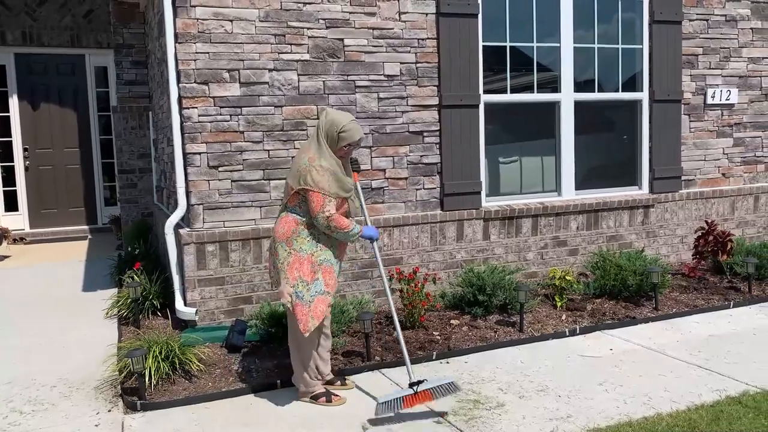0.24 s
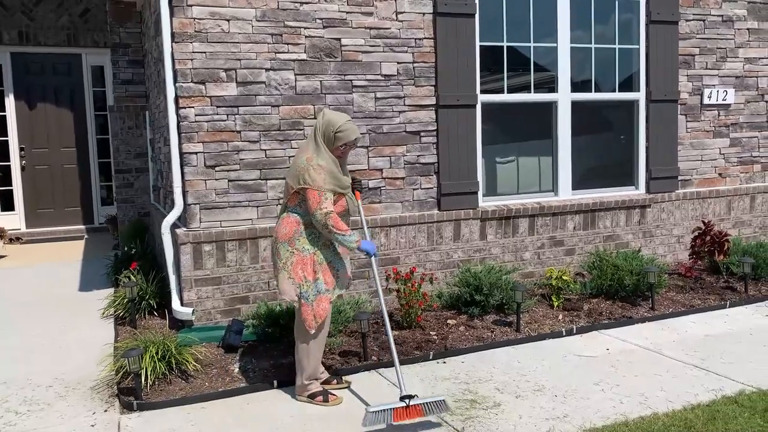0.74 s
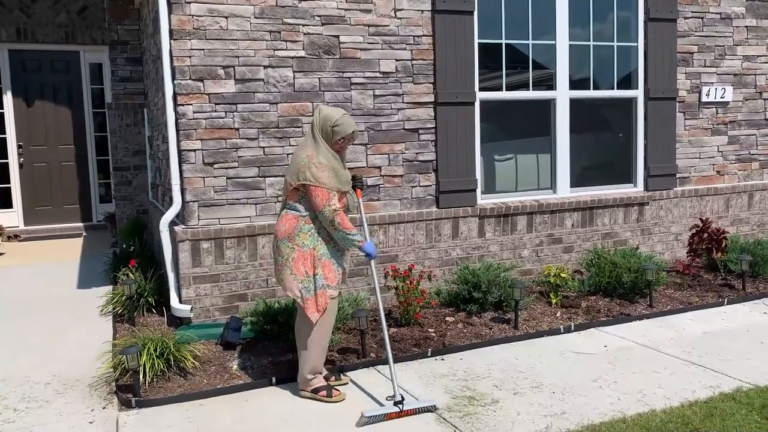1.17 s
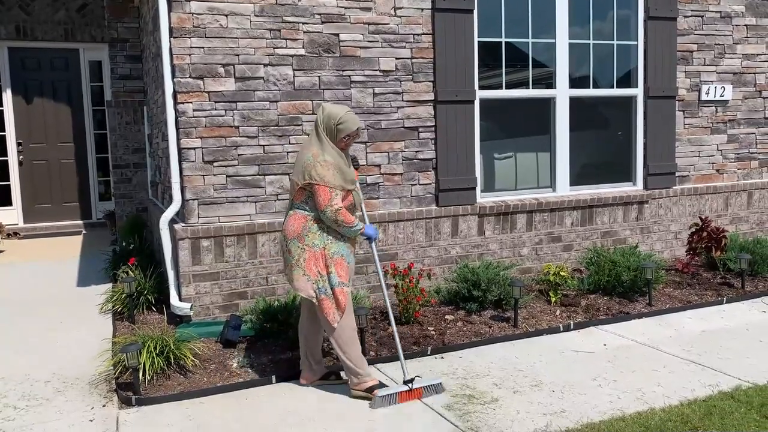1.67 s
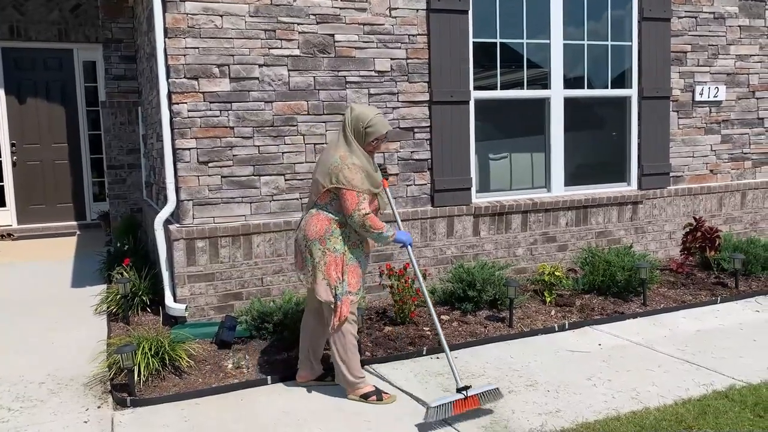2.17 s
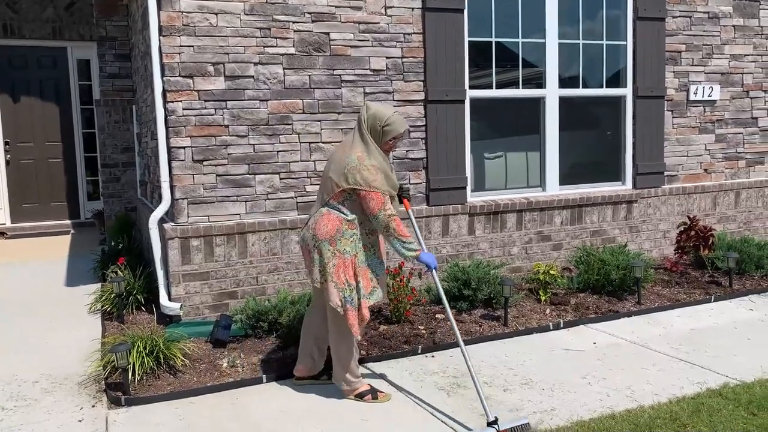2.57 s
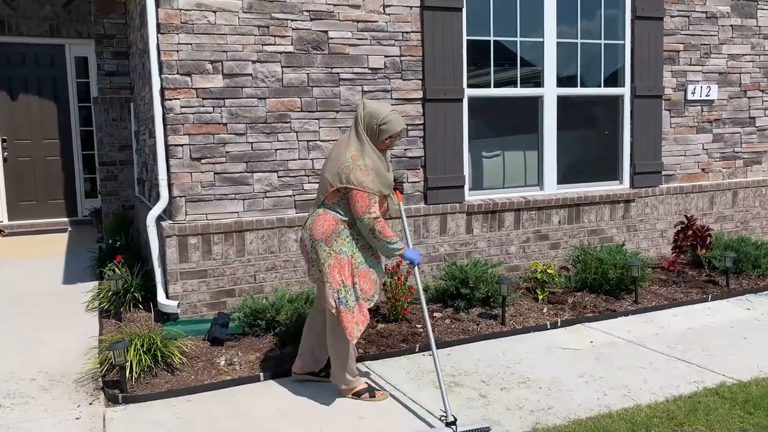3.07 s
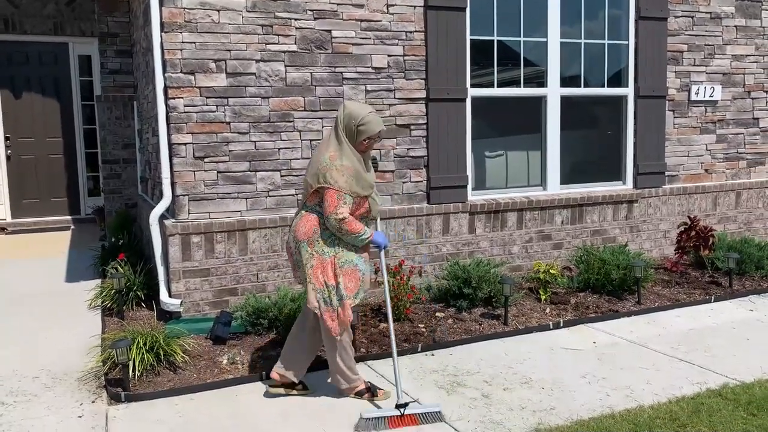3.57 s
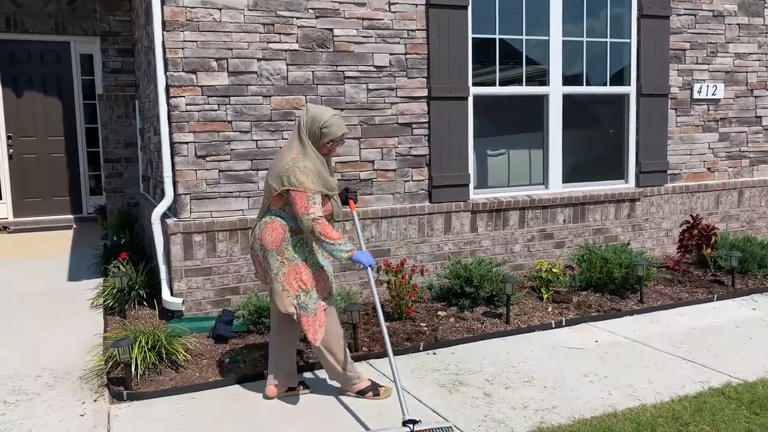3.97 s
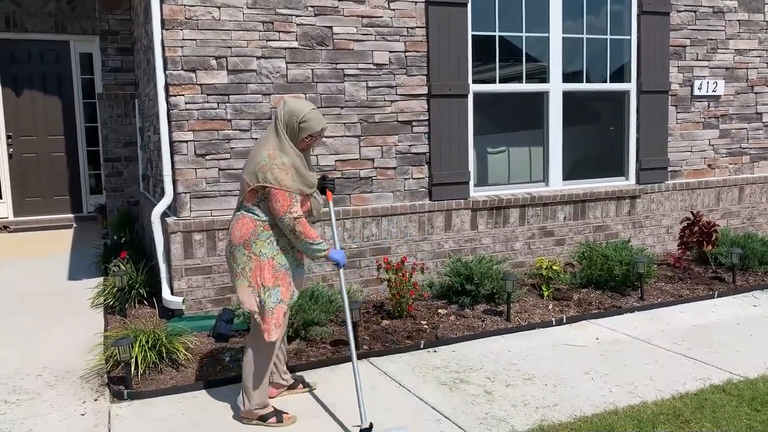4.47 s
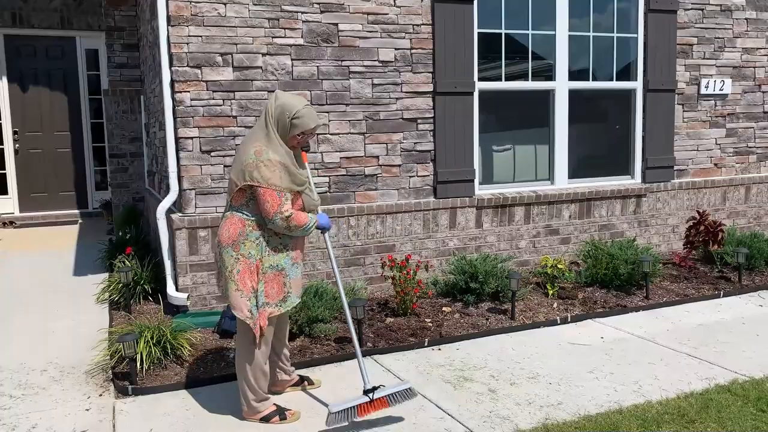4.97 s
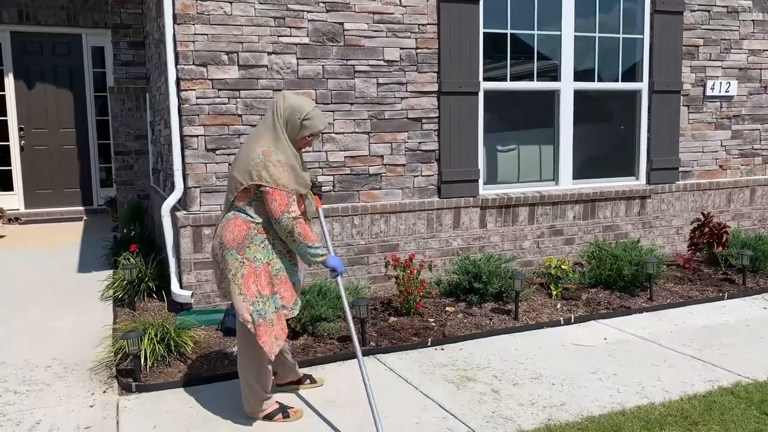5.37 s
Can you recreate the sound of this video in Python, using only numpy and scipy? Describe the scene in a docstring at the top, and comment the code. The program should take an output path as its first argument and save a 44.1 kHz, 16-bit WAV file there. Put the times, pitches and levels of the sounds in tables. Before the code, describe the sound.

A stiff push broom sweeps grass cuttings along a concrete path outdoors. A stroke is already under way at the start, and more follow at about 0.4, 1.0, 1.6, 2.2, 2.9, 3.5, 4.2 and 5.1 seconds. Each of these begins with a brushy slap and a small knock of the hollow broom head, often with a quick bounce, then swells into a bright hiss and gritty scrape lasting roughly a third of a second. A thin rustle sometimes whispers between strokes, and the house wall adds a short, weak echo. Wind rumbles unevenly on the microphone, strongest from about 2.6 to 3.3 seconds, with a low thump near 3.2 seconds and smaller gusts until around 4.4. Underneath, throughout, are a faint neighbourhood murmur, the wavering hum of a distant air conditioner and a very faint, rapid, high ticking from the camera.

```python
"""Stiff bristles scratch over grit as a push broom sweeps grass cuttings along a concrete path.
The broom lands with a brushy slap and a knock of its hollow head, then hisses and scrapes as it is
pushed. The brick house behind it adds a short echo. Wind buffets the microphone now and then, over
a faint outdoor murmur, a far air conditioner's hum and the very faint, high ticking of a camera."""
import sys
import numpy as np
from scipy import signal
from scipy.fft import rfft, irfft, next_fast_len
from scipy.io import wavfile
from scipy.ndimage import uniform_filter1d

SR = 44100
rng = np.random.default_rng(int(sys.argv[2]) if len(sys.argv) > 2 else 0)


def log_audio(samples):
    """Write samples as a 16-bit WAV file to the path given in sys.argv[1]."""
    # one column per channel
    frames = np.atleast_2d(samples).T
    # limit to full scale, then quantise
    limited = np.clip(frames, -1, 1)
    pcm = np.round(limited * 32767).astype(np.int16)
    wavfile.write(sys.argv[1], SR, pcm)


N = 248283
TIME = np.arange(N) / SR
FFT_SIZE = next_fast_len(N + 8192)
FREQS = np.fft.rfftfreq(FFT_SIZE, 1 / SR)

# The pushes of the broom. Each row: start, time to top speed, speed-up time, slow-down time and time
# until the hand eases off, all in seconds; the drop on easing in dB; relative levels of hiss, scrape
# and spreading bristles in dB; treble tilt in dB per octave.
STROKES = [(0.0, 0.014, .136, 0.083, 0.11, 10, -33, -40, -57, 4),
           (0.407, 0.25, 0.3, 0.08, 0.26, 5, -36, -46.5, -63, 1),
           (0.987, 0.22, 0.18, 0.15, 0.36, 12, -33.5, -46, -58, 0),
           (1.629, 0.21, 0.17, 0.17, .305, 3, -34, -46.5, -61, -1),
           (2.216, 0.24, 0.18, 0.17, 0.324, 7.5, -34.8, -47, -51, -0.5),
           (2.914, .17, 0.19, .138, 0.17, 9.5, -36, -47, -49, 0),
           (3.505, 0.19, 0.16, 0.2, 0.25, 11.5, -34, -46.5, -46.5, 0.54),
           (4.176, 0.25, 0.17, 0.16, 0.31, 1.5, -32, -44.5, -46.5, 0.8),
           (5.053, .2, 0.16, 0.15, 0.45, 19, -33.5, -43.5, -55, 1)]


def pushes(swing_db=23, settle_s=0.044):
    """How strong hiss and scrape are: the bristles spread, the arm speeds up and slows, the hand eases."""
    hiss, scrape = np.zeros((2, N))
    for start, top, up, down, ease, ease_db, hiss_db, scrape_db, spread_db, _ in STROKES:
        age = np.maximum(TIME - start, 0)
        # the arm reaches speed early and runs out gradually
        slowness = np.where(age < top, np.abs((top - age) / up) ** 2.95, np.abs((age - top) / down) ** 1.82)
        eased = (1 + np.tanh((age - ease) / 0.013)) / 2
        effort = amp(-swing_db * np.minimum(slowness, 10) - ease_db * eased)
        spread = amp(spread_db) * np.exp(-age / settle_s)
        hiss += (TIME >= start) * (amp(hiss_db) * effort + spread)
        # the scrape follows the effort less steeply than the hiss
        scrape += (TIME >= start) * (amp(scrape_db) * effort ** 0.78 + amp(-8) * spread)
    return hiss, scrape


# The bright hiss of the bristle tips. Each row: frequency in Hz, relative level in dB.
HISS_COLOUR = [(2000, -54), (5000, -35.5), (6500, -12), (7800, -8.5), (8800, -2.5), (10300, 2), (12000, -1),
               (13700, -1), (15000, -6.5), (16000, -6)]
# The lower scrape over the grit. Each row: frequency in Hz, relative level in dB.
SCRAPE_COLOUR = [(200, -2), (500, -16.5), (750, -9.5), (1050, -3), (1350, -11.5), (1600, -6), (1950, -1.5),
                 (2450, -2), (2800, 2), (4000, 1), (5500, -1), (7300, 3.5), (9500, -12.5), (16000, -6)]


def bristles(hiss_db=2, scrape_db=3):
    """Thousands of bristle tips flick off uneven grit; whole tufts catch and let go together."""
    tufts = amp(1.2 * wander(19) + 0.5 * wander(350))  # slow bumps of grit, fast chatter
    hiss_gain, scrape_gain = pushes()
    hiss = stereo(clicks(per_s=26000, spread_db=1.5) * tufts * hiss_gain, colour(HISS_COLOUR))
    scrape = stereo(clicks(per_s=16000, spread_db=2.0) * tufts * scrape_gain, colour(SCRAPE_COLOUR))
    hiss = patchy_rasp(hiss, depth_db=2.36)
    scrape = patchy_rasp(scrape, depth_db=2.5)
    return amp(hiss_db) * hiss + amp(scrape_db) * scrape


def patchy_rasp(sound, depth_db):
    """Narrow bands swell and fade at random, giving the hiss and scrape a patchy rasp."""
    bands = signal.stft(sound, nperseg=512, noverlap=384)[2]
    patches = uniform_filter1d(rng.standard_normal(bands.shape[1:]), size=3, axis=0)  # smooth over pitch
    patches = uniform_filter1d(patches, size=16, axis=1)  # and over time
    gain = unit_level(amp(depth_db * unit_level(patches)))
    return signal.istft(bands * gain, nperseg=512, noverlap=384)[1][:, :N]


# The broom head touches down or bounces. Each row: time in seconds, relative level in dB, extra dB for
# the splash, extra dB for the knock, centre of the knock in Hz, fade time in seconds.
LANDINGS = [(0.37, -42.5, 1.5, 0, 1520, 0.038), (0.409, -40, -9, -4, 2060, 0.02),
            (0.976, -39.5, 2.5, -4, 1400, 0.01), (0.985, -35.5, 9, -4.5, 1220, 0.0079),
            (1.6, -42.5, 4, -13, 2020, 0.016), (1.629, -41, 8.5, -1, 1580, 0.012),
            (2.172, -48.5, -1, -1.5, 2040, 0.0042), (2.208, -37, -2, -11, 1540, 0.0045),
            (2.252, -33.5, 4, -6, 1520, 0.0072), (2.901, -31.5, 3.5, -8, 1420, 0.0052),
            (2.915, -33, -1, -1.5, 1400, 0.0053), (3.502, -37, 5, -2, 1880, 0.007),
            (3.512, -33.5, 6.5, 0, 1180, 0.0067), (3.523, -41.5, 10, 3, 1970, 0.011),
            (4.148, -50, 9, 7.5, 1760, 0.042), (4.173, -43, 9, 6, 1940, 0.0066),
            (5.033, -44, 2, -7, 1910, 0.019), (5.053, -33.5, 8, -7.5, 1980, 0.0063)]
# The dull slap on the concrete. Each row: frequency in Hz, relative level in dB.
SLAP_COLOUR = [(150, -16), (600, -5.5), (900, 5.5), (1300, -5), (1800, 3), (2500, 4), (3500, 2),
               (5000, -2.5), (7000, -2), (10000, -5), (16000, -19)]


def slaps(slap_db=-7, splash_db=-9, rise_s=0.0005):
    """The bristles hit the concrete within a few milliseconds: a dull slap and a bright splash."""
    slap, splash = np.zeros((2, N))
    for start, level_db, extra_db, _, _, fade_s in LANDINGS:
        age = np.maximum(TIME - start + rise_s, 0)
        blow = amp(level_db) * (1 - np.exp(-age / rise_s)) * np.exp(-age / fade_s)
        slap += blow
        splash += blow * amp(extra_db)
    dull = stereo(clicks(per_s=9000, spread_db=0) * slap, colour(SLAP_COLOUR))
    bright = stereo(clicks(per_s=30000, spread_db=5.5) * splash, colour(HISS_COLOUR))
    return amp(slap_db) * dull + amp(splash_db) * bright


# The notes of the hollow broom head. Each row: pitch in Hz, width in Hz (wider dies away sooner),
# relative level in dB.
HEAD_NOTES = [(706, 35, 3), (1012, 39, 1.5), (1180, 107, 2), (1388, 110, 6.5), (1525, 55, 3.5),
              (1918, 86, 5), (2077, 43, 1), (2700, 60, 1), (3140, 47, 10)]


def knocks(knock_db=-3, reach_octaves=0.53, rise_s=0.0006):
    """Each landing rings the head; the point of contact picks the notes within about an octave."""
    hz, width, note_db = np.transpose(HEAD_NOTES)[:, :, None]
    age = TIME[:SR // 10]
    attack = 1 - np.exp(-age / rise_s)
    out = np.zeros((2, N))
    for start, level_db, _, extra_db, centre_hz, _ in LANDINGS:
        weight = amp(note_db) * np.exp(-(np.log2(hz / centre_hz) / reach_octaves) ** 2)
        weight /= np.linalg.norm(weight)
        phase = 2 * np.pi * rng.random((2, len(HEAD_NOTES), 1))
        notes = weight * np.exp(-np.pi * width * age) * np.sin(2 * np.pi * hz * age + phase)
        first = round(start * SR)
        out[:, first:first + len(age)] += amp(level_db + extra_db) * attack * notes.sum(axis=1)
    return amp(knock_db) * stereo(out, np.ones(len(FREQS)))


# The broom is drawn back. Each row: middle in seconds, relative level in dB, half length in seconds.
DRAW_BACKS = [(.25, -67, 0.49), (2.66, -72.5, 0.13), (4.02, -75, 0.076), (4.7, -70, 0.29)]
# The thin rustle this makes. Each row: frequency in Hz, relative level in dB.
RUSTLE_COLOUR = [(2000, -22), (3800, -10), (5000, 0.5), (5500, -9), (6100, -7.5), (7200, -8), (9000, -10),
                 (16000, -12)]


def rustle(rustle_db=-1):
    """Cloth and loose cuttings whisper between the strokes."""
    gain = swells(DRAW_BACKS, rest_db=-84) * amp(rustle_db + 1.4 * wander(40))
    return stereo(rng.standard_normal((2, N)) * gain, colour(RUSTLE_COLOUR))


def near_echoes(sound, echo_db=-6.5, dull_hz=7000, longest_s=0.014, count=5, lifted_s=0.078):
    """Echoes off ground, edging and wall colour each stroke differently; each gets its own treble tilt."""
    out = np.zeros((2, len(FREQS)), complex)
    # the broom is over its new spot just before the bristles come down
    spot = np.searchsorted([row[0] - lifted_s for row in STROKES[1:]], TIME)
    octaves = np.log2(np.maximum(FREQS, 4000) / 9000)
    for stroke, (*_, tilt_db) in enumerate(STROKES):
        taps = np.zeros((2, FFT_SIZE))
        delays = (SR * longest_s * rng.uniform(0.1, 1, (2, count))).astype(int)
        np.put_along_axis(taps, delays, rng.choice([-1, 1], delays.shape) / np.sqrt(count), axis=1)
        # rough surfaces scatter the highest treble away
        echoes = amp(echo_db) * rfft(taps) / (1 + (FREQS / dull_hz) ** 4)
        out += rfft(sound * (spot == stroke), FFT_SIZE) * amp(tilt_db * octaves) * (1 + echoes)
    return irfft(out, FFT_SIZE)[:, :N]


def house_wall(sound, echo_db=-18, delay_s=0.016, die_away_s=0.2):
    """Rough brick and the porch scatter a short, weak echo."""
    age = TIME[:SR // 2] - delay_s
    taps = rng.standard_normal((2, len(age))) * (rng.random((2, len(age))) < 2500 / SR)
    taps *= (age > 0) * amp(-60 * np.abs(age) / die_away_s)
    taps /= np.linalg.norm(taps, axis=1, keepdims=True)
    dull = signal.lfilter(*signal.butter(1, 7000, fs=SR), sound)
    return amp(echo_db) * signal.fftconvolve(dull, taps, axes=1)[:, :N]


# Gusts over a light breeze. Each row: middle in seconds, relative level in dB, half length in seconds.
GUSTS = [(0.35, -51.5, .15), (0.88, -50, 0.18), (1.44, -47, 0.095), (2.35, -53, .17), (2.61, -44.5, .04),
         (2.83, -42.5, 0.1), (3.01, -39, 0.041), (3.2, -41.5, 0.074), (3.68, -45, 0.058),
         (3.83, -45.5, 0.081), (4.25, -48, .18)]
# The deep rumble of the wind. Each row: frequency in Hz, relative level in dB.
RUMBLE_COLOUR = [(15, -44), (26, -24), (42, -2.5), (70, -2.5), (100, -7), (150, -16.5), (250, -30.5),
                 (600, -75), (2000, -101)]
# Single shoves of air. Each row: middle in seconds, peak in dB, pitch in Hz, half length in seconds.
SHOVES = [(2.158, -38, 59, 0.0075), (2.631, -34.5, 74.5, 0.015), (2.82, -47, 102, 0.011),
          (3.142, -32.5, 70, 0.012), (3.194, -31, 68.4, 0.032), (3.249, -23, 75, 0.0094),
          (3.78, -34, 51, 0.011)]


def wind(rumble_db=-1, lumpy_db=3):
    """Swirling air rumbles unevenly on the microphone, with a few distinct shoves."""
    gain = swells(GUSTS, rest_db=-58) * amp(rumble_db + lumpy_db * wander(13.5))
    out = stereo(rng.standard_normal((2, N)) * gain, colour(RUMBLE_COLOUR))
    for middle, peak_db, hz, half_s in SHOVES:
        offset = TIME - middle
        out += amp(peak_db) * np.exp(-(offset / half_s) ** 2) * np.cos(2 * np.pi * hz * offset)
    return out


# The murmur of the neighbourhood. Each row: frequency in Hz, relative level in dB.
MURMUR_COLOUR = [(30, -15), (70, 1), (120, 2.5), (190, -3), (290, -5), (420, -10), (700, -15.5),
                 (1100, -18), (2000, -21), (3000, -26.5), (3800, -38.5), (7500, -44), (13000, -35),
                 (16000, -41)]
# The tones of a far air conditioner. Each row: pitch in Hz, typical level in dB.
HUM_TONES = [(120, -62.5), (240, -68.5), (292, -72.5), (589, -77.5)]


def outdoors(murmur_db=-56, sway_db=1.9, waver_hz=2.32):
    """The even wash of the neighbourhood, with an air conditioner's wavering hum in it."""
    gain = amp(murmur_db + sway_db * wander(6.3))
    out = stereo(rng.standard_normal((2, N)) * gain, colour(MURMUR_COLOUR))
    for hz, level_db in HUM_TONES:
        cycles = np.cumsum(hz + waver_hz * wander(7.04)) / SR
        out += amp(level_db + 4 * wander(3.2)) * np.sin(2 * np.pi * cycles)
    return out


# The camera's high tick. Each row: frequency in Hz, relative level in dB.
TICK_COLOUR = [(4000, -32), (8600, -15), (10000, -3.5), (11200, -10), (12400, -0.5), (13700, -6),
               (14800, -25), (16000, -39)]


def camera_ticks(tick_db=-63, first_s=0.0292, every_s=1 / 30, half_s=0.002):
    """A tiny, high tick comes with every picture the camera takes."""
    offset = (TIME - first_s + every_s / 2) % every_s - every_s / 2
    gain = amp(tick_db + 1.5 * wander(30)) * np.exp(-(offset / half_s) ** 2)
    return stereo(rng.standard_normal((2, N)) * gain, colour(TICK_COLOUR))


# How alike left and right sound. Each row: frequency in Hz, likeness from 0 (unrelated) to 1 (the same).
LIKENESS = [(60, .88), (200, .82), (350, .45), (550, .03), (1100, .45), (1400, .35), (2000, .74),
            (2700, .5), (4100, .72), (5200, .28), (6400, .72), (7700, .76), (8500, .98), (10000, .93),
            (13400, .96), (16000, .86)]
# How far the left side runs ahead. Each row: frequency in Hz, lead in radians.
LEFT_LEAD = [(100, 0), (1800, .1), (2700, .9), (3700, .1), (5000, .5), (6500, -.2), (7500, -1.6),
             (8550, -3.1), (9800, -4.9), (11000, -6.3), (12200, -7.8), (13400, -9.4), (14600, -11),
             (16000, -13)]
# How much louder the left side is. Each row: frequency in Hz, left minus right in dB.
LEFT_LOUDER = [(150, 0), (600, 2), (1300, 1.5), (2200, 0.5), (3800, 0), (5200, -2.5), (6500, -0.3),
               (9000, 0)]


def stereo(pair, gains):
    """Colours two unrelated signals and blends them as the microphone's two openings hear one source."""
    first, second = rfft(pair, FFT_SIZE) * unit_level(gains)
    likeness = curve(LIKENESS)
    shared = first * np.sqrt((1 + likeness) / 2)
    apart = second * np.sqrt((1 - likeness) / 2)
    lean = amp(curve(LEFT_LOUDER) / 2) * np.exp(0.5j * curve(LEFT_LEAD))
    return irfft(np.array([(shared + apart) * lean, (shared - apart) / lean]), FFT_SIZE)[:, :N]


def amp(db):
    """Turns decibels into a gain."""
    return 10 ** (np.asarray(db) / 20)


def unit_level(x):
    """Scales a signal so that its average (rms) level is 1."""
    return x / np.sqrt(np.mean(x ** 2) + 1e-20)


def curve(table):
    """Joins a table's points to give a value at every frequency."""
    hz, value = np.transpose(table)
    return np.interp(np.log(FREQS + 1), np.log(hz + 1), value)


def colour(table):
    """Turns a table of levels into a gain at every frequency."""
    return amp(curve(table))


def wander(rate_hz):
    """A smooth random wobble of size 1, mostly slower than the given rate."""
    spectrum = rfft(rng.standard_normal(FFT_SIZE)) / (1 + (FREQS / rate_hz) ** 4)
    return unit_level(irfft(spectrum, FFT_SIZE)[:N])


def clicks(per_s, spread_db):
    """Two unrelated streams of tiny clicks; more spread makes a few of them stand out."""
    size = amp(spread_db * np.minimum(rng.exponential(1, (2, N)), 4))
    return unit_level(size * rng.choice([-1, 1], (2, N)) * (rng.random((2, N)) < per_s / SR))


def swells(rows, rest_db):
    """A gain that rises from its resting level and falls back once for each row."""
    power = sum(amp(db) ** 2 * np.exp(-2 * ((TIME - middle) / half_s) ** 2) for middle, db, half_s in rows)
    return np.sqrt(amp(rest_db) ** 2 + power)


def scene():
    """The broom and its echo, then the wind and the background."""
    broom = near_echoes(bristles() + slaps() + knocks() + rustle())
    return broom + house_wall(broom) + wind() + outdoors() + camera_ticks()


def record(dry, cutoff_hz=15790):
    """Cuts away the very highest treble."""
    low_pass = signal.firwin(601, cutoff_hz, window=("kaiser", 9), fs=SR)
    return signal.oaconvolve(dry, low_pass[None], "same")


dry = scene()
out = record(dry)
log_audio(out)
```